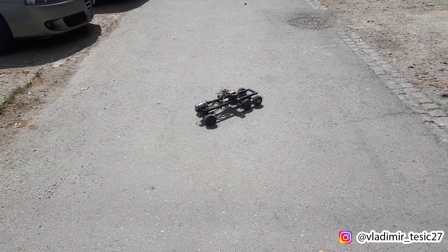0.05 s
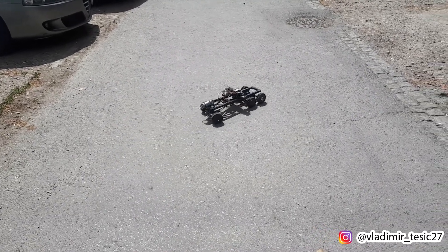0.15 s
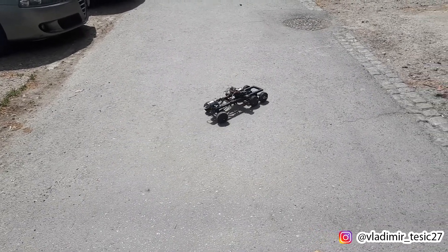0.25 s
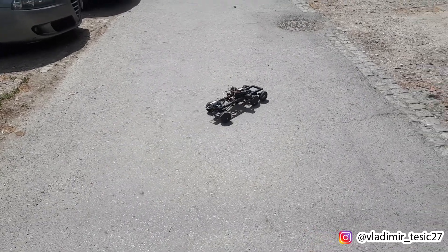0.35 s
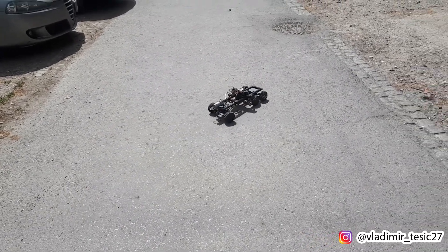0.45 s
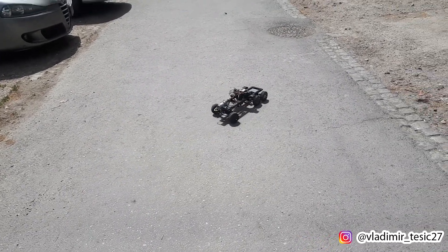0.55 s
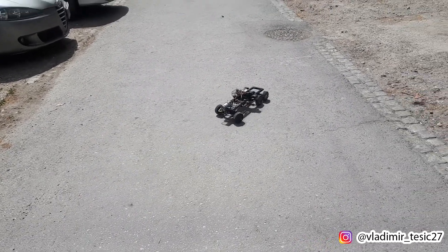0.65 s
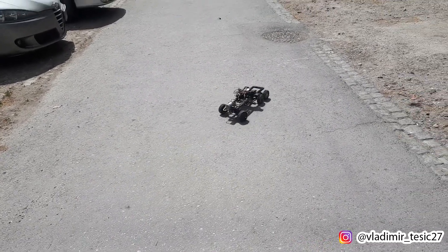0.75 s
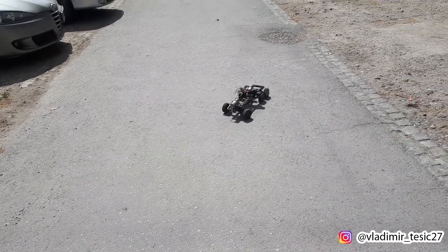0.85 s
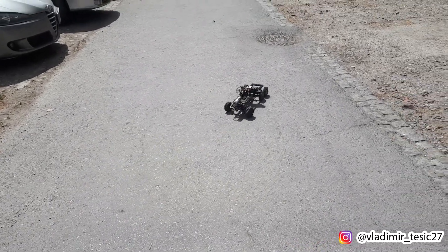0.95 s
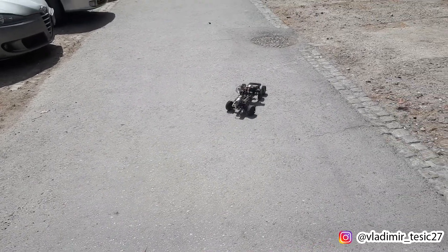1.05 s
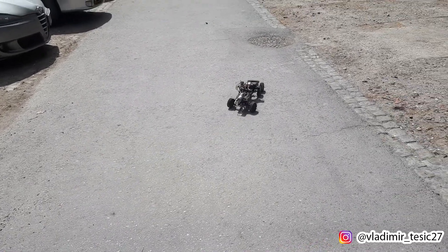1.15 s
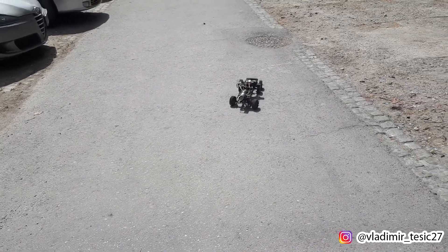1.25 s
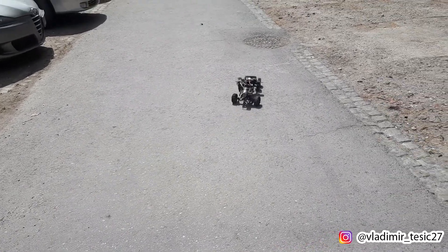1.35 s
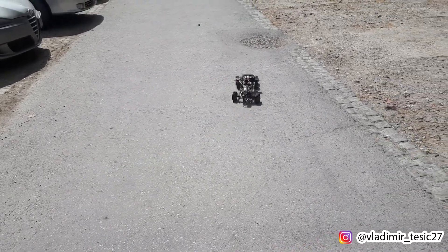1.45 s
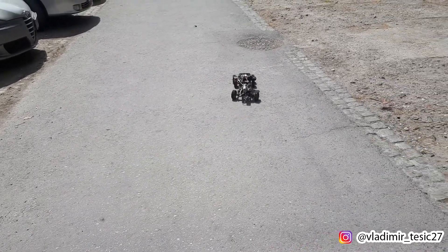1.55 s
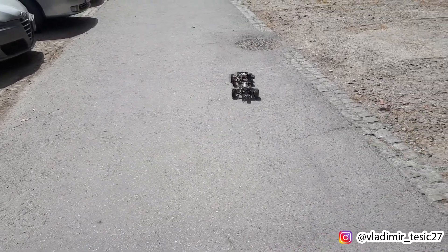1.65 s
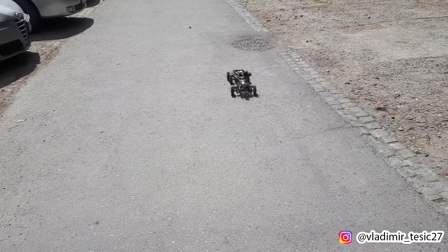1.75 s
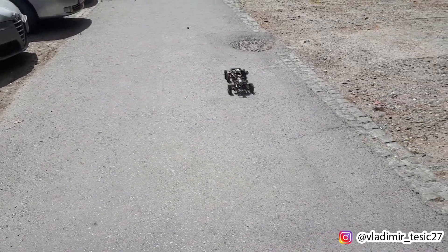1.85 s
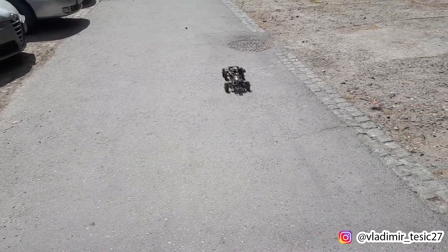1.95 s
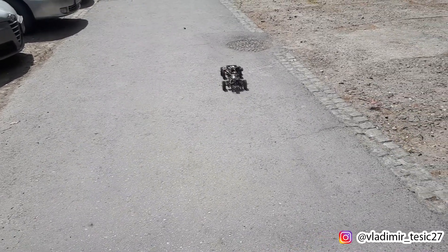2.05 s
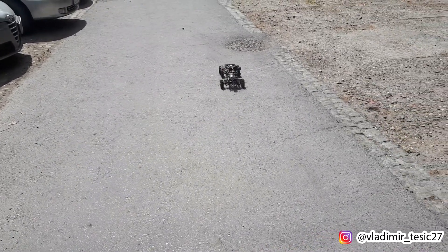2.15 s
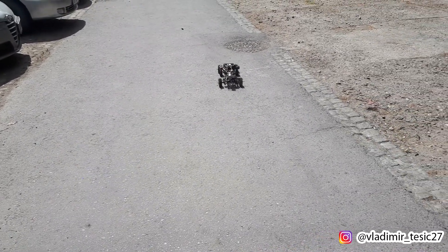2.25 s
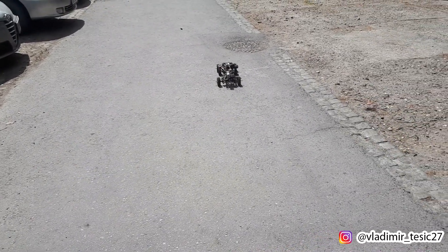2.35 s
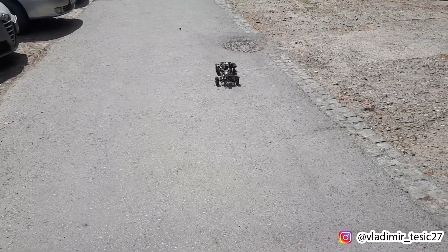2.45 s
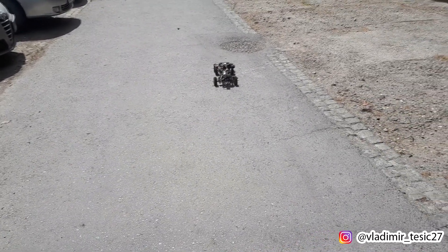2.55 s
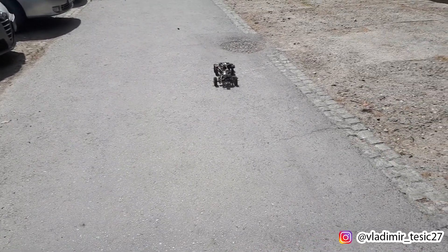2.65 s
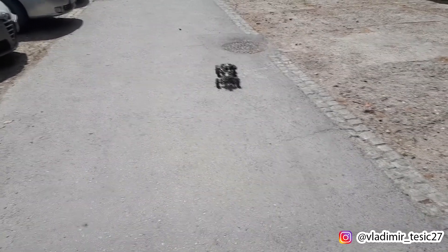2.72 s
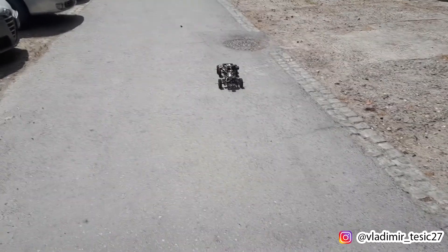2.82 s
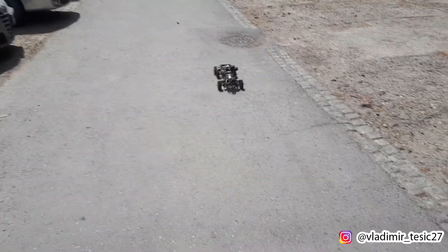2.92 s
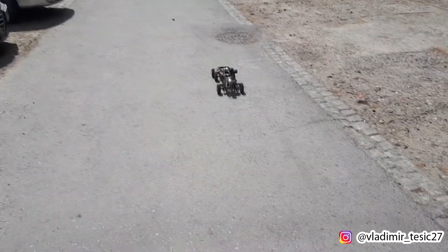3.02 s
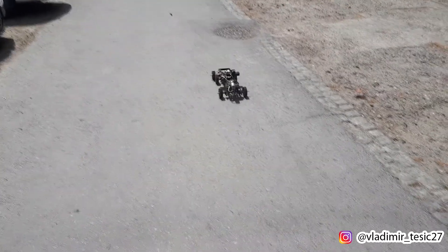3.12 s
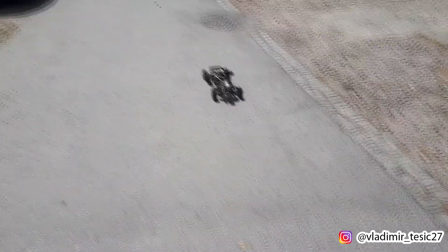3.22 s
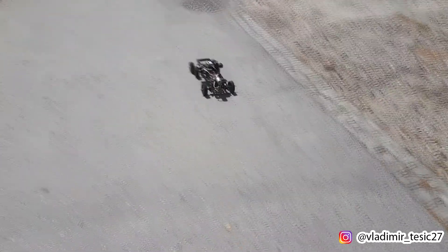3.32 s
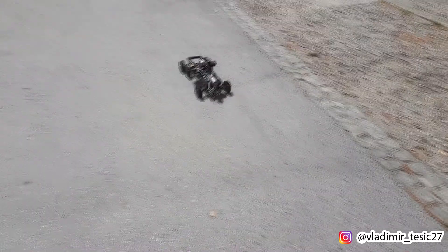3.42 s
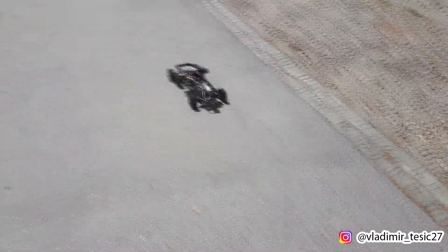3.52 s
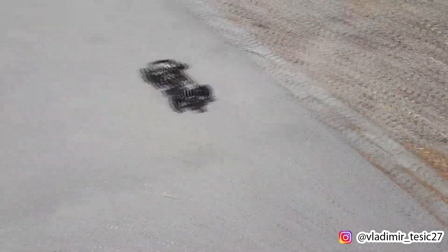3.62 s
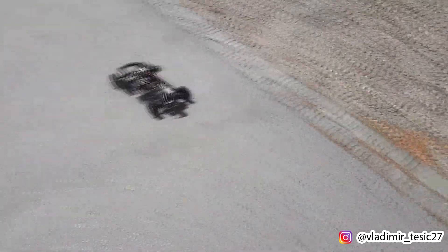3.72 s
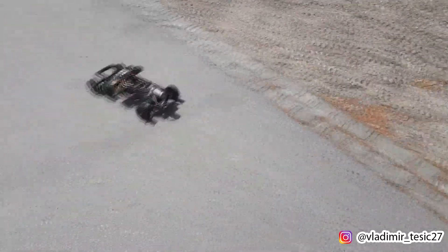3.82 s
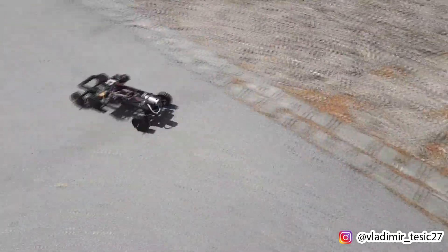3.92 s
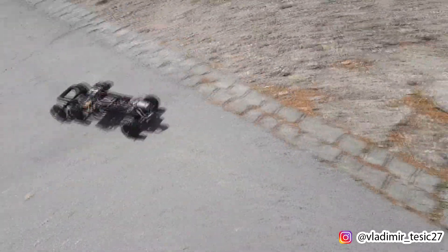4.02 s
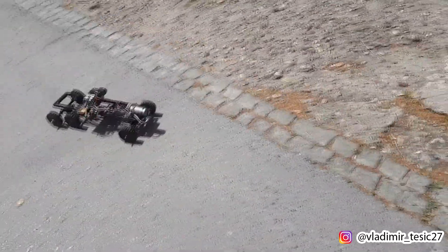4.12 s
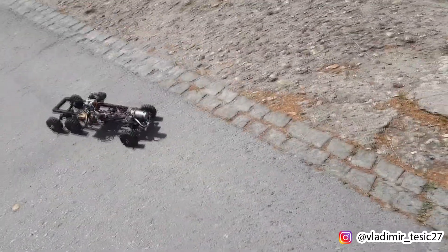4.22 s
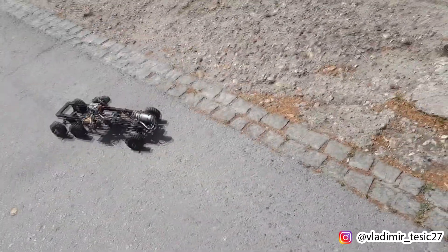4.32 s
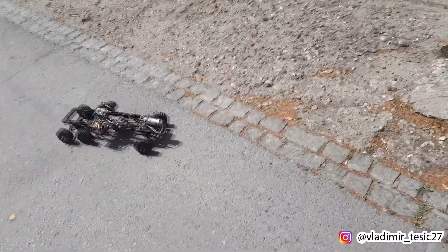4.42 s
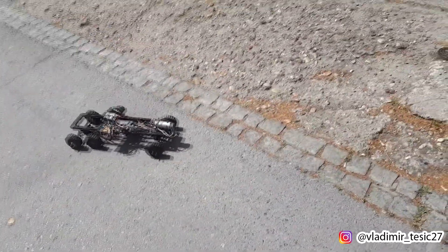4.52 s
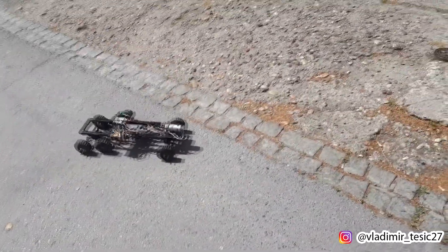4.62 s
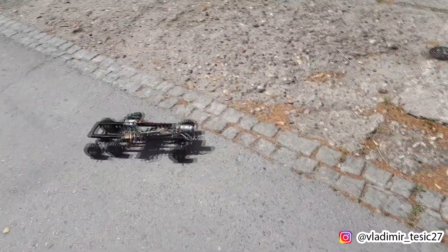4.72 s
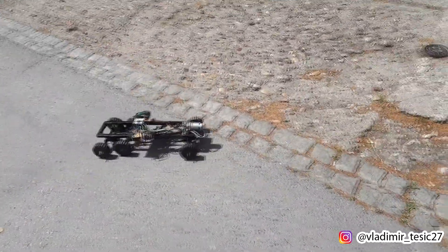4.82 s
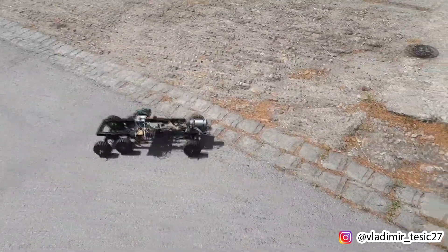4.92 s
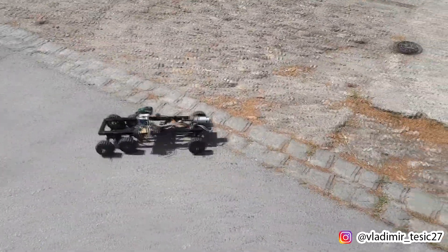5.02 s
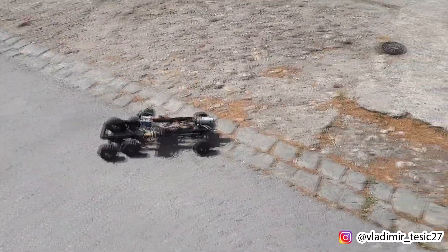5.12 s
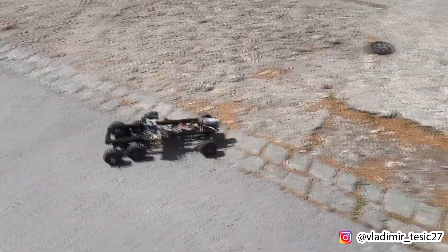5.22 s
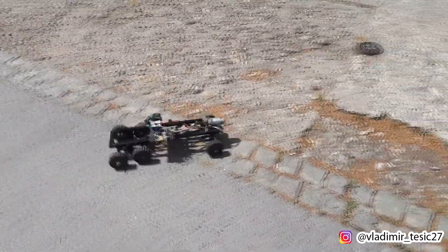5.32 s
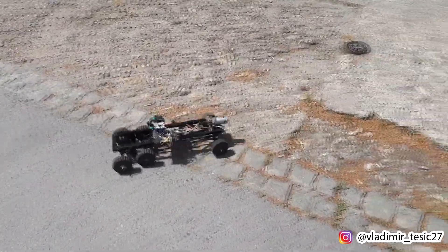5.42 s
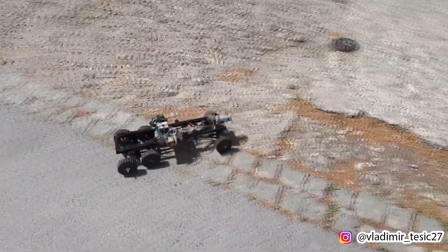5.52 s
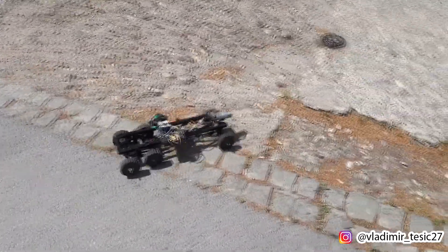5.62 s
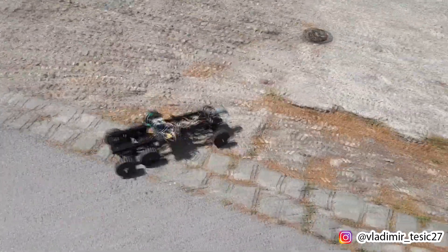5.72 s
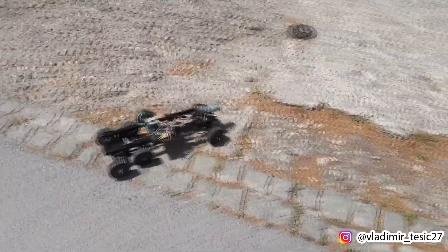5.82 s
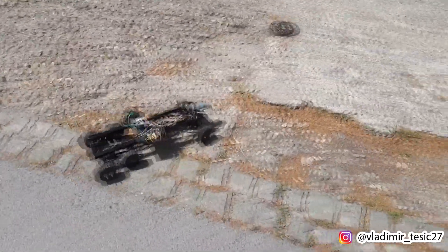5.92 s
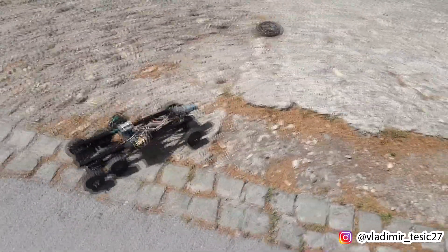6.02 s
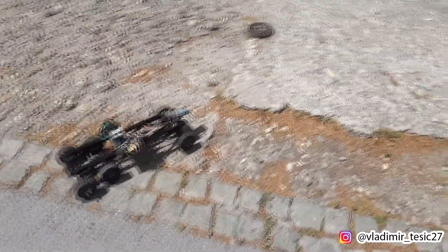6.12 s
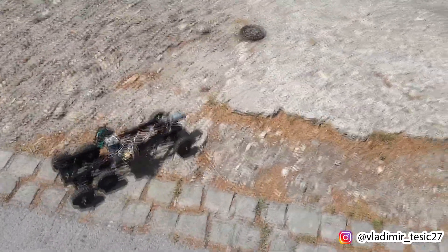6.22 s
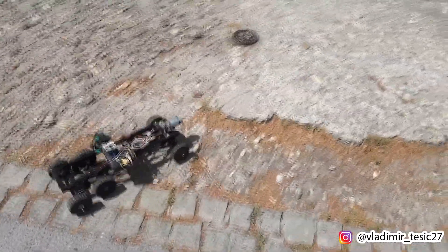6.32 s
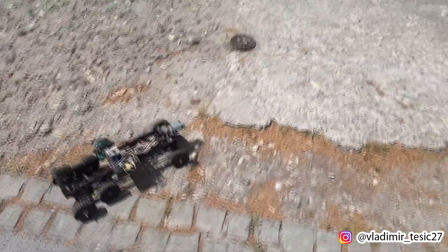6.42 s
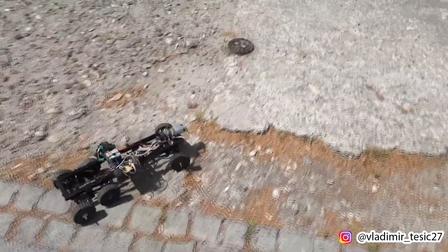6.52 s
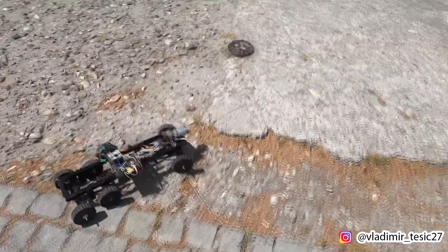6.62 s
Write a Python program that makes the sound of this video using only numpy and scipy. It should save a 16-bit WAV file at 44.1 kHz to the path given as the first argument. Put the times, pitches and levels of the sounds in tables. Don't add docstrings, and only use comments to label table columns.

```python
import sys
import numpy as np
from scipy import signal
from scipy.fft import rfft, irfft, next_fast_len
from scipy.io import wavfile
from scipy.ndimage import uniform_filter1d

SR = 44100
rng = np.random.default_rng(int(sys.argv[2]) if len(sys.argv) > 2 else 0)


def volts(x):
    e = np.asarray(x, float) / 20
    return 10 ** e


def store_wav(level_fs):
    pcm = np.round(np.clip(np.atleast_2d(level_fs), -1, 1) * 32767)
    wavfile.write(sys.argv[1], SR, pcm.T.astype(np.int16))


N = 293706
T = np.arange(N) / SR

# time in s, speed lost in turns per second.
SNAGS = [(0.019, 5.152), (0.372, 9.55), (0.694, 7.563), (1.021, 11.57), (1.327, 10.252), (1.627, 14.028)]


def unit(x):
    return x / np.sqrt(np.mean(x ** 2))


def curve(table):
    s, *columns = np.transpose(table)
    return [np.interp(T, s, c) for c in columns]


def held(table):
    s, *columns = np.transpose(table)
    row = np.searchsorted(s[1:], T)
    return [uniform_filter1d(c[row], int(0.119 * SR)) for c in columns]


def tents(table):
    return sum(size * np.clip(1 - np.abs(T - s) / width, 0, 1) for s, size, width in table)


def walk(rate):
    k = int(SR / rate)
    steps = np.repeat(rng.standard_normal(N // k + 1), k)
    return 2.0 * uniform_filter1d(steps, k)[:N]


def colour(x, points, share=1.0, turn=0.):
    size = next_fast_len(N)
    hz, db = np.transpose(points)
    bins = np.arange(size // 2 + 1) * SR / size
    gain = volts(share * np.interp(np.log(bins + 1), np.log(hz), db))
    return irfft(rfft(x, size) * gain * np.exp(1j * turn), size)[..., :N]


def ringing(hz, rate):
    phase = 2 * np.pi * np.cumsum(hz) / SR
    return walk(rate) * np.cos(phase) + walk(rate) * np.sin(phase)


def add(out, s, sound):
    i = int(s * SR)
    out[..., i:i + sound.shape[-1]] += sound[..., :N - i]


def sides(pan_db):
    return volts(np.array([[pan_db], [-pan_db]]) / 2)


def shaft_speed():
    # time in s, speed in turns per second.
    shaft = [(0.0, 73.25), (1.662, 80.83), (2.121, 29.4), (2.756, 25.92), (2.987, 76.66), (3.481, 80.82),
             (3.837, 76.02), (3.998, 37.89), (4.17, 58.06), (4.41, 57.57), (4.859, 73.8), (5.353, 78.57),
             (5.853, 22.89), (5.969, 21.26), (6.119, 49.65), (6.199, 38.25), (6.425, 24.5), (6.66, 38.25)]
    # time in s, turns per second gained, half width in s.
    speed_shifts = [(.045, -4, .05), (.13, 2.5, .08), (.31, -5, .05), (.415, 5, .05), (4.35, 3, .067),
                    (4.425, -5, .04), (2.97, -8, .125), (5.25, -4, .25), (6.45, -3.5, .07), (6.59, 3.5, .07)]
    dip_s = .089
    return curve(shaft)[0] - tents([(s, lost, dip_s) for s, lost in SNAGS]) + tents(speed_shifts)


def tyre_scrub():
    start_s, attack_s, end_s, fall_db_per_s = 2.19, 0.035, 2.52, -110
    since = T - start_s
    scrape = volts(-48 + fall_db_per_s * np.clip(since - attack_s, 0, 1))
    drag = volts(-62)
    scrub = np.clip(since / attack_s, 0, 1) * (scrape + drag)
    return scrub * np.clip((end_s - T) / 0.0082, 0, 1)


def drive_levels():
    # time in s, rattle in dB, whine re rattle in dB, throb depth from 0 to 1.
    drive = [(0, -44.5, 0.5, 0.52), (1.72, -47, 0.5, 0.54), (2.06, -61, -1.5, 0.22), (2.33, -74.5, 9, 0.58),
             (2.69, -88, 5, 0.2), (2.72, -71.5, -20, 0), (2.98, -55, 1.5, 0.11), (3.88, -48, -10, 0.46),
             (4.04, -66, 2.5, 0), (4.16, -41.5, -10.5, 0.24), (4.37, -45, -4, 0.3), (4.82, -39, -1.5, 0.6),
             (5.42, -37.5, -1.5, 0.7), (5.76, -49.5, -0.5, 0.64), (5.97, -54.5, 1.5, 0.76),
             (6.14, -41, 0.5, 0.69), (6.43, -49.5, -7, 0.48), (6.66, -42.5, -3, 0.49)]
    # time in s, gain in dB, half width in s.
    lurches = [(1.725, 6.5, 0.028), (2.27, 8, 0.067), (4.11, 4, 0.014), (4.135, -4, 0.014),
               (4.165, -3.5, .025), (3.7, 2, 0.039), (6.38, 3, .06), (8.2, -4, 0.044), (6.52, 0.5, .04),
               (2.78, 4, 0.055), (4.195, -2.5, 0.012), (4.235, -2.5, 0.029), (1.95, 3, 0.081),
               (5.66, 4, 0.031), (6.3, -1.5, 0.018), (5.8, 9.5, 0.013), (5.9, -2, 0.078), (7.2, 2.5, 0.009),
               (6.46, 2.5, 0.037), (5.36, 1.5, 0.065)]
    # time in s, whine gain in dB, half width in s.
    bites = [(.02, 1.5, 0.084), (0.36, -12, 0.028), (0.75, 1.5, .12), (0.78, 2.5, 0.2), (4.9, 0, 0.027),
             (4.035, -21, 0.031), (3.975, 9.5, 0.028), (5.3, -4.5, 0.13), (4.9, -1, 0.045), (1.05, 1, 0.13),
             (6.6, 6, 0.028), (1.89, -7, 0.069), (2.9, 4, 0.07), (3.57, 4.5, .11), (3.4, -8, 0.037),
             (4.165, 7.5, 0.03), (4.07, 4, 0.027), (5.72, 8, .035), (3.78, 3, .05), (1.72, 2, .04),
             (.55, 3, 0.16), (1.4, 1.5, 0.16), (4.82, 4, .06), (5.46, 2.5, .05), (3.45, 1.5, 0.45),
             (3.4, 3, 0.11), (4.08, 0, .04), (3.2, 2.5, 0.13), (5.06, -2, 0.42), (5.62, 1.5, 0.068),
             (6.04, -4, 0.049)]
    effort_db, whine_db, depth = curve(drive)
    effort_db = effort_db + tents(lurches)
    wind_up_s, let_go_s = 0.19, 0.019
    ago = [T - s + let_go_s for s, _ in SNAGS]
    strain = uniform_filter1d(sum(np.clip(1 + a / wind_up_s, 0, 1) * (a < 0) for a in ago), 800)
    slack = tents([(s, -2.5, 0.06) for s, _ in SNAGS])
    over = effort_db + slack + 45
    rattle = volts(effort_db + slack + 0.5 * strain)
    hiss = volts(-49 + over + 3.5 * strain)
    whine = volts(effort_db + whine_db + tents(bites) - 3.5 * strain)
    roll = volts(-50.5 + 0.74 * over) + tyre_scrub()
    return rattle, hiss, whine, roll, np.clip(depth, 0, 1)


def mesh_whine(speed, teeth, backward, place, luck):
    # start in s, second in dB, third in dB re whine.
    upper = [(0, -17, -11), (.9, -29, -6.5), (2.3, -37, -10), (4.1, -16, -20), (4.5, -3, -9),
             (5.4, -7, -30)]
    tight = np.exp(-.5 * ((place + 0.038 * luck[0]) / 0.087) ** 2) * volts(1.9 * luck[1])
    mesh = 2 * np.pi * (teeth * place + .035 * luck[2])
    blur = .55 * walk(300)
    second_db, third_db = held(upper)
    third_hz = 3 * teeth * speed
    cover = .25 + sum(np.exp(-.5 * ((third_hz - hz) / 130) ** 2) for hz in (4330, 4900))
    tone = np.sin(mesh + .28 * blur)
    tone = tone + volts(second_db) * np.sin(2 * mesh + blur)
    tone = tone + volts(third_db) * cover * np.sin(3 * mesh + 1.7 * blur)
    steady = .1 + .03 * backward + .005 * np.clip(speed - 66, 0, None)
    return unit(tone * (tight + steady))


def loose_teeth(speed, teeth, bind):
    # start in s, level in dB re whine.
    loose = [(0, -9), (1.8, -5), (2.7, -2), (3.8, -6), (4.1, -4), (4.5, -10), (5.4, -7)]
    band = np.array([ringing(.95 * teeth * speed, 320) for port in range(2)])
    return volts(held(loose)[0]) * unit(band * bind)


def shell_modes(throb):
    # start in s, low in Hz, its dB, high in Hz, its dB re rattle.
    shell = [(0, 3110, -8, 5410, -15), (.78, 2610, -42, 4950, -17), (1.65, 2700, -16, 4290, -11),
             (1.88, 2700, -28, 4300, -13), (2.1, 2700, -26, 4300, -27), (2.72, 2500, -22, 4300, -17),
             (3.15, 2880, -33, 4800, -17), (3.76, 3450, -21, 4960, -19), (4.0, 2610, -17.5, 5230, -24),
             (6.02, 2714, -2, 5060, -7), (6.2, 2700, -10, 5120, -11.5), (6.55, 2660, -12, 5300, -11.5)]
    # frequency in Hz, level in dB re rattle.
    frame = [(2050, -22), (2450, -22), (2750, -22), (3150, -21), (3600, -21), (4250, -23), (4650, -22),
             (5050, -22), (5450, -23)]
    low_hz, low_db, high_hz, high_db = held(shell)
    modes = volts(low_db) * ringing(low_hz, 350) + volts(high_db) * ringing(high_hz, 450)
    for hz, db in frame:
        modes = modes + volts(db + 2.2 * walk(13)) * ringing(np.full(N, hz), 330)
    drive = throb ** 1.6
    return modes * drive / np.mean(drive)


def impact_noise(strike, throb):
    # frequency in Hz, level in dB.
    chassis = [(1800, -20.5), (2600, -2), (3300, 0.5), (4500, -3.5), (5400, -4), (6000, -9.5),
               (8000, -23.5)]
    # frequency in Hz, level in dB per Hz.
    sliding = [(3410, -32), (5800, -2.5), (8640, -1.5), (11400, 0), (13200, -0.5), (15200, 0),
               (15900, -8.5)]
    # frequency in Hz, level in dB.
    rolling = [(120, -17), (250, -13.5), (450, -16), (800, -5), (1200, -5.5), (2000, 1), (2700, -5),
               (3200, -10), (4200, -50)]
    common = np.array([.36, .4, .8])
    both, own = rng.standard_normal((3, 1, N)), rng.standard_normal((3, 2, N))
    share = np.clip(common, 0, 1)[:, None, None]
    noise = np.sqrt(share) * both + np.sqrt(1 - share) * own
    rattle = unit(colour(noise[0] * strike * throb, chassis)) * volts(2.8 + 1.0 * walk(25))
    hiss = unit(colour(noise[1] * strike * throb, sliding)) * volts(2.0 + 0.71 * walk(30))
    roll = unit(colour(noise[2] * (0.66 + 1.1 * throb), rolling)) * volts(7.0 + walk(20))
    return rattle, hiss, roll


def gears():
    speed = shaft_speed()
    backward = (T > 2.65) & (T < 4.02)
    teeth = np.where(backward, 20.0, 20.7)
    rattle_gain, hiss_gain, whine_gain, roll_gain, depth = drive_levels()
    angle = .234 + .5 + np.cumsum(speed) / SR
    turn = angle.astype(int)
    luck = rng.standard_normal((1000, 4))[turn].T
    place = angle - turn - .5
    strike = volts(2.5 * rng.standard_normal(20000))[(angle * 21).astype(int)]
    width = np.where(place < -.09, 0.15, 0.3)
    bind = np.exp(-.5 * ((place + 0.081) / width) ** 2) * volts(0.34 * luck[3])
    throb = 1 - depth + 0.59 * depth * bind
    rattle, hiss, roll = impact_noise(strike, throb)
    rattle = rattle + shell_modes(throb) * volts(2.5 * walk(14))
    whine = mesh_whine(speed, teeth, backward, place, luck) + loose_teeth(speed, teeth, bind)
    whine = whine * np.clip((speed - 27) / 12, 0, 1)
    return rattle * rattle_gain + hiss * hiss_gain + roll * roll_gain + whine_gain * volts(3.5) * whine


def knocks():
    # time in s, peak in dB, lows re peak in dB, length in s.
    blows = [(1.5, -28, -21, 0.003), (1.7194, -20, -6.5, 0.0037), (4.7, -28, -7, 0.0051),
             (4.885, -29, -37, 0.0065), (5.093, -18, -19, 0.0039), (5.663, -13.5, -11.5, 0.0028),
             (5.7, -15.5, -15, 0.0025), (5.799, -15.5, -15.5, 0.0019), (6.033, -32, -7, 0.002),
             (6.058, -29, -9, 0.002), (6.085, -28, -15, .002), (6.0, -27, -15, .002),
             (5.909, -38, -13, .002), (6.2, -19, -15, .0012), (6.5, -23, -15, .0012),
             (5.634, -21, -18, .0012), (5.52, -21, -15, .0012), (6.197, -27, -17, 0.0022),
             (5.791, -29, -4, 0.0027), (6.11, -18.5, -17, 0.0072), (6.164, -14, -30, 0.0022)]
    out = np.zeros((2, N))
    t = T[:1500]
    for s, db, low_db, length in blows:
        shape = t / length * np.exp(1 - t / length) * volts(db - 12.0)
        add(out, s - .001, rng.standard_normal((2, len(t))) * shape * [[1], [volts(low_db)]])
    bright = colour(out[0], [(800, -47), (2500, 7.5), (5500, -3.5), (6500, -12.0), (15000, -7.0)])
    thud = colour(out[1], [(300, 5.0), (800, 15.5), (1400, 20.0), (2500, -36)])
    return bright + thud


def tyres():
    # frequency in Hz, level in dB.
    cobbles = [(120, -35), (220, 5), (350, 4), (500, -8.5), (800, -37)]
    # time in s, half width in s, Hz, glide in Hz per s, level in dB.
    squeals = [(3.0, .04, 1980, 5000, -56), (2.985, .02, 2120, 0, -58), (2.615, .025, 4700, 5000, -80),
               (5.35, .05, 1980, -600, -50), (6.14, .04, 1950, 0, -52), (3.8, .07, 3250, 2500, -57),
               (3.875, .03, 3500, 3000, -51), (4.185, .045, 3600, -2000, -48),
               (4.18, .05, 5020, -1500, -49), (6.12, .015, 1300, 0, -46), (6.15, .035, 2700, 0, -46),
               (.33, .05, 2900, -3000, -55), (.2, .12, 3120, 600, -56), (.55, .14, 3200, 0, -56),
               (.3, .2, 5380, 300, -56), (.65, .12, 5400, 0, -56), (.8, .08, 5150, 0, -56),
               (4.52, .15, 2680, 300, -52), (5.3, .15, 3250, -500, -50), (5.43, .02, 950, 0, -47),
               (5.485, .02, 930, 0, -48)]
    thud = unit(colour(rng.standard_normal(N), cobbles)) * volts(-59 + 2.2 * walk(15))
    out = thud * np.clip((T - 4.17) / 0.96, 0, 1)
    for s, width, hz, glide, db in squeals:
        pitch = hz + glide * np.clip(T - s, -width, width)
        out = out + volts(db) * tents([(s, 1, width)]) * ringing(pitch, 230)
    return out


def trigger():
    # time in s, peak in dB, left minus right in dB, treble tilt in dB per octave, chatter in s.
    clicks = [(2.1345, -22, -3, 7, 0.0016), (2.1664, -22, -4, 9, 0.0022), (2.5003, -28, 1, -6, 0.0025),
              (2.5265, -42, -3, -6, 0.003), (2.162, -37, -3, 9, .002)]
    # frequency in Hz, level in dB, t60 in s.
    plastic = [(910, -27, 0.0059), (1520, -23, 0.0086), (2300, 8, 0.021), (2680, 14.5, 0.0045),
               (3280, 8, 0.0046), (3820, 4, 0.006), (4700, 0, 0.0087), (6600, -15, 0.0027),
               (12100, -15, 0.0034)]
    # frequency in Hz, level in dB.
    crack_points = [(3000, -30), (6000, -4), (9500, -14), (12500, 0), (14500, -4), (16000, -12)]
    crack_levels = [-17, -15, -7.5, 0, -5]
    lever_levels = [-6, -3, -30, -30, -8]
    lever_hz, lever_t60_s, crack_s = 3930, .022, 0.0016
    out = np.zeros((2, N))
    t = T[:800]
    for (s, db, pan_db, tilt_db, length), crack_db, lever_db in zip(clicks, crack_levels, lever_levels):
        ring = np.zeros(len(t))
        for hz, g, t60 in plastic:
            ring += volts(g + tilt_db * np.log2(hz / 3000) - 60 * t / t60) * np.sin(2 * np.pi * hz * t)
        blows = rng.standard_normal(len(t)) + 1.7 * rng.standard_normal((2, len(t)))
        chatter = blows * np.exp(-t / length) * (1 - np.exp(-t / 0.00026))
        snap = signal.fftconvolve(chatter, ring[None], axes=1)
        snap = colour(np.pad(snap, ((0, 0), (0, N))), [(250, -30), (800, 0)])[:, :1600]
        add(out, s, snap / np.abs(snap).max(axis=1, keepdims=True) * volts(db) * sides(pan_db))
        lever = np.sin(2 * np.pi * lever_hz * t) * volts(db + lever_db - 60 * t / lever_t60_s)
        add(out, s, lever * np.clip(t / .001, 0, 1) * sides(pan_db))
        crack = unit(colour(rng.standard_normal((2, N)), crack_points))[:, :len(t)]
        crack = crack * t / crack_s * np.exp(-t / crack_s * 2)
        add(out, s, crack * volts(db + crack_db) * 2 * sides(pan_db))
    return out


def wind():
    # time in s, peak in dB, frequency in Hz, left minus right in dB.
    bumps = [(1.554, -41.5, 122, 12), (2.11, -52, 79.5, 17), (2.157, -41, 100, 7), (2.183, -42, 101, 10),
             (2.92, -42, 154, 15), (2.936, -48, 109.1, 15), (4.502, -48.5, 100.1, 13),
             (6.639, -44, 191, -5.5)]
    out = np.zeros((2, N))
    t = T[:4000]
    band = signal.butter(2, (100, 260), "bandpass", fs=SR, output="sos")
    for s, db, hz, pan_db in bumps:
        swing = np.sin(2 * np.pi * hz * t) * np.exp(-(t * hz / 1.32) ** 2)
        add(out, s, volts(db + 4.0) * sides(pan_db) * swing)
        flutter = unit(signal.sosfilt(band, rng.standard_normal(len(t))))
        add(out, s, volts(db - 11.5) * sides(pan_db) * flutter * np.exp(-t / 0.044))
    return out


def traffic():
    # frequency in Hz, level in dB per Hz.
    town = [(24, -44), (40, -8), (58, -1), (98, 0), (123, -0.5), (174, -3), (197, -5), (350, -10),
            (377, -14.5), (591, -9), (1910, -12), (3300, -25), (15500, -79)]
    # time in s, gain in dB, half width in s.
    swells = [(.6, 4.5, 1), (1.8, 7.5, 0.85), (2.72, 3, .25), (3.85, 1.5, .15), (4.0, -0.5, 0.25),
              (4.64, 5, 0.41), (5.15, 2, 0.82), (5.7, 10, 0.67), (6.4, 11, 0.25)]
    mid, side = colour(rng.standard_normal((2, N)), town)
    side = colour(side, [(60, -1), (150, -7), (300, -7), (700, -3), (1400, 0)])
    rumble = unit(mid + side * np.array([[1], [-1]]))
    return rumble * volts(-59 + tents(swells) + 2.5 + 0.9 * walk(9))


def idling_engine():
    phase = 2 * np.pi * np.cumsum(61 + 1.34 * walk(4)) / SR
    fade = np.clip((T - 4.4) / 1.3, .1, 1)
    return fade * volts(-60 + 2 * walk(6.3)) * np.sin(phase)


def late(x, ms):
    return np.interp(T - ms / 1000, T, x)


def at_ports(truck):
    # start in s, delay in ms.
    bounce = [(0, 0.97), (.85, 1.16), (3.7, 1.34), (4.03, 0.79)]
    # frequency in Hz, left minus right in dB.
    port_levels = [(60, 5), (110, -5), (200, -5), (380, -10), (700, 1.5), (1290, 1.5), (2380, -6),
                   (4400, 10.5), (8120, 18.5), (15000, 20)]
    # frequency in Hz, radians by which the left leads.
    port_phase = [(0, 0), (1890, 2.0), (2150, 2.8), (2410, 2.4), (2670, 4.3), (2930, 3.6), (3620, 5.7),
                  (5680, 8.6), (6550, 12.6), (6800, 12.6), (8010, 16.8), (9730, 20.1), (12500, 30.5),
                  (16600, 43.8)]
    left, right = truck
    far, = held(bounce)
    left = left + volts(-14) * late(left, 0.3984) + volts(-23.5) * late(left, 1.335)
    right = right + volts(-10.5) * late(right, far)
    size = next_fast_len(N)
    lead = np.interp(np.arange(size // 2 + 1) * SR / size, *np.transpose(port_phase))
    left = colour(left, port_levels, share=0.29)
    right = colour(right, port_levels, share=-0.51, turn=-lead)
    return np.array([left, right])


def scene():
    truck = at_ports(gears() + knocks())
    return truck + tyres() + trigger() + wind() + traffic() + idling_engine()


def roll_off(x):
    return signal.sosfilt(signal.butter(12, 17030, fs=SR, output="sos"), x)


def record(dry):
    dry = signal.sosfilt(signal.butter(2, 38, "highpass", fs=SR, output="sos"), dry)
    dry = dry + volts(-82) * rng.standard_normal(dry.shape)
    cut = signal.sosfilt(signal.ellip(10, .2, 70, 15850, fs=SR, output="sos"), dry)
    return roll_off(cut)


dry = scene()
out = record(dry)
store_wav(out)
```